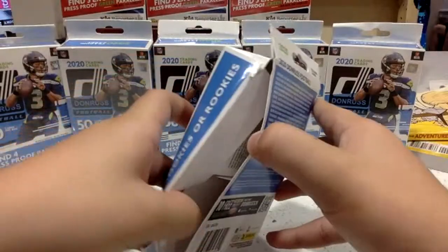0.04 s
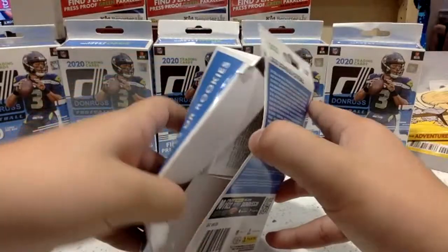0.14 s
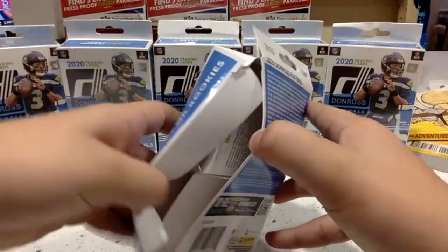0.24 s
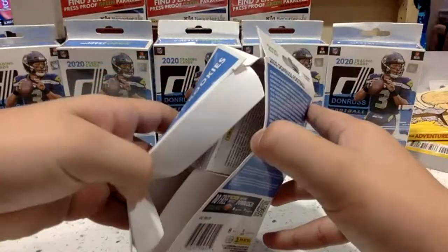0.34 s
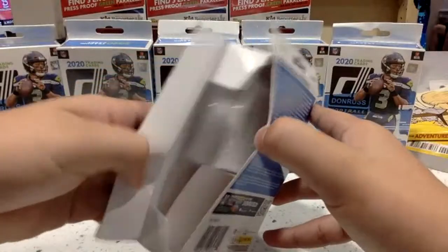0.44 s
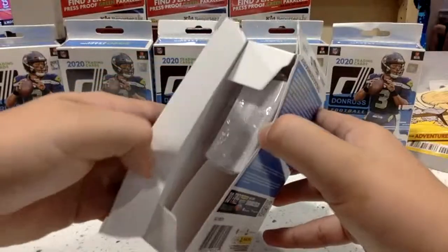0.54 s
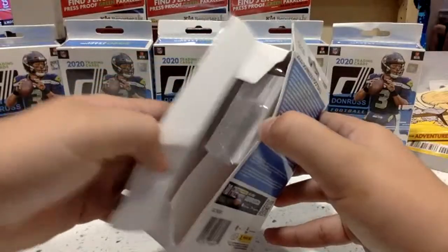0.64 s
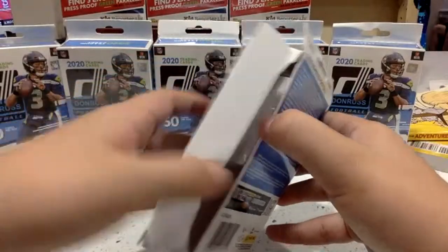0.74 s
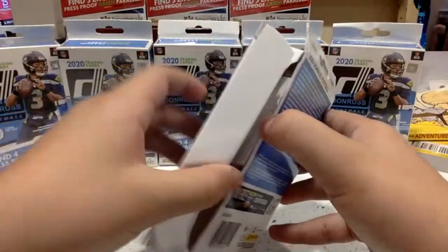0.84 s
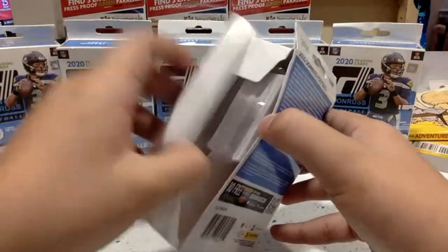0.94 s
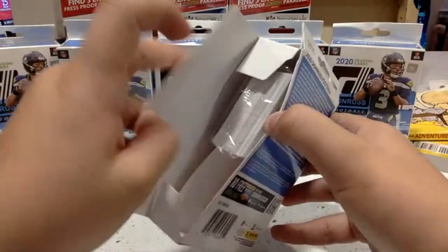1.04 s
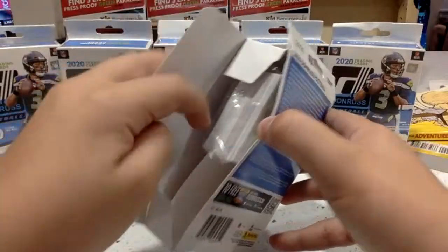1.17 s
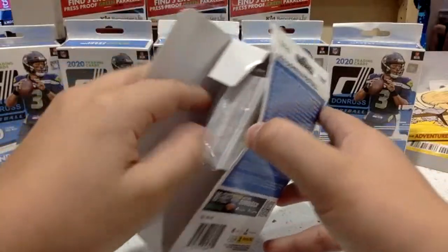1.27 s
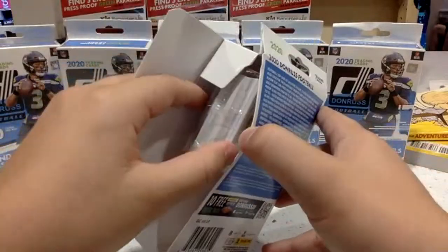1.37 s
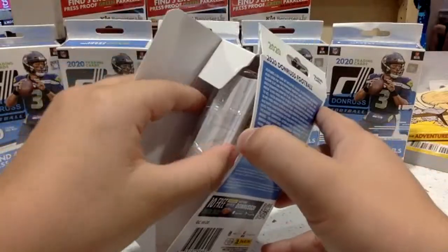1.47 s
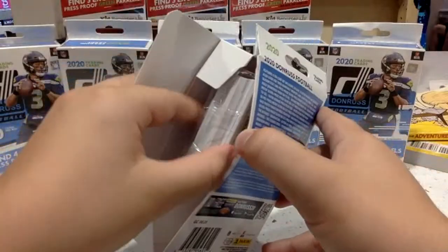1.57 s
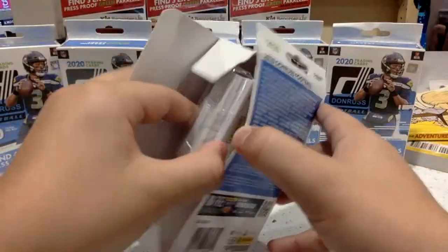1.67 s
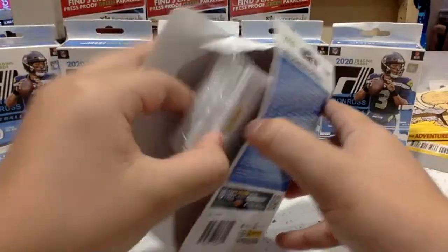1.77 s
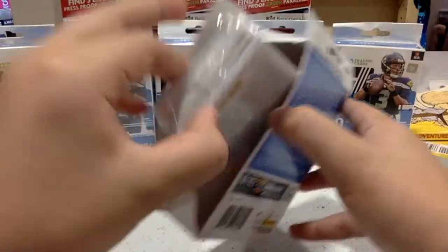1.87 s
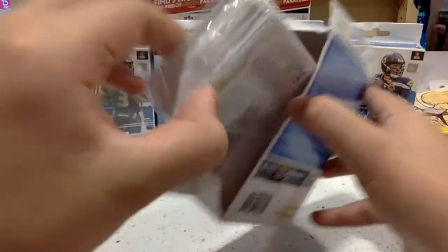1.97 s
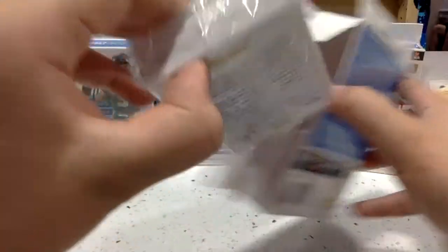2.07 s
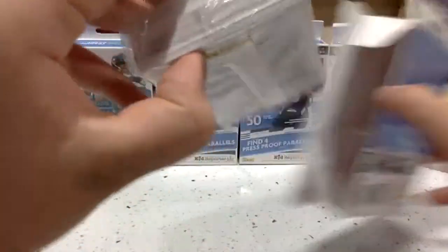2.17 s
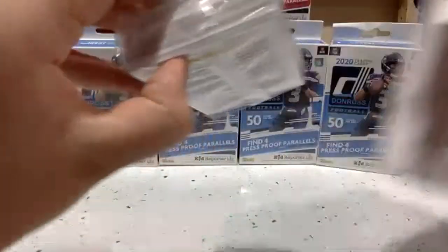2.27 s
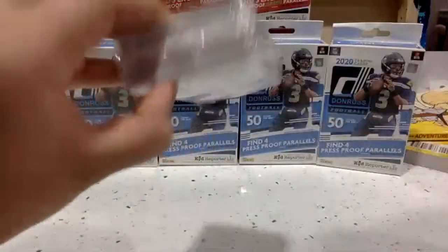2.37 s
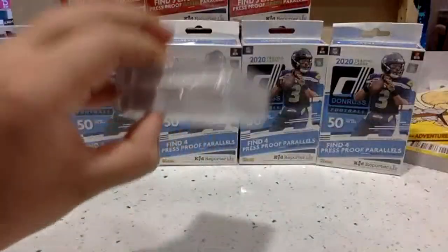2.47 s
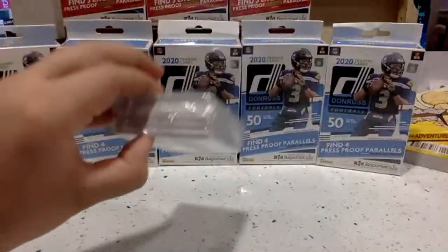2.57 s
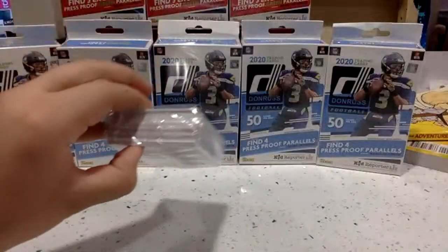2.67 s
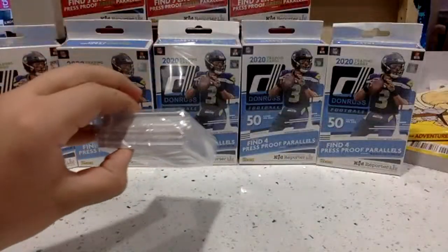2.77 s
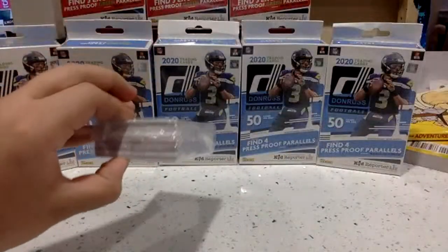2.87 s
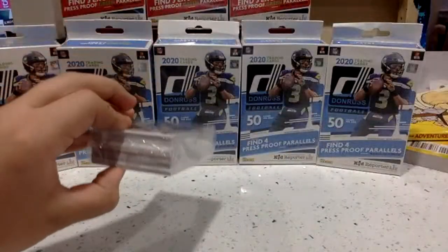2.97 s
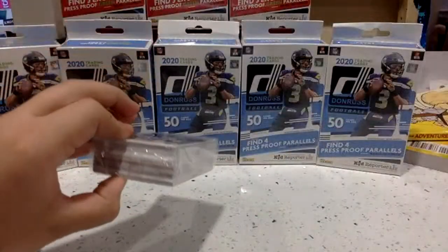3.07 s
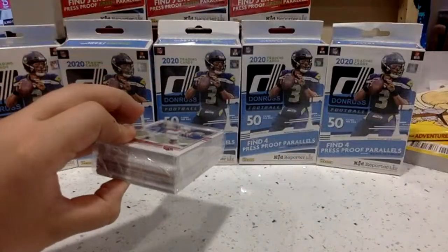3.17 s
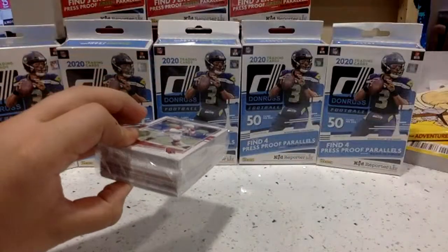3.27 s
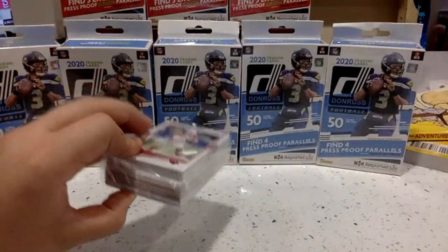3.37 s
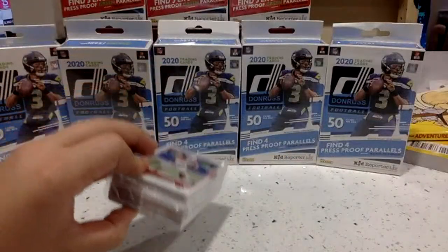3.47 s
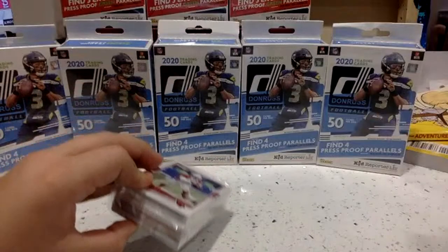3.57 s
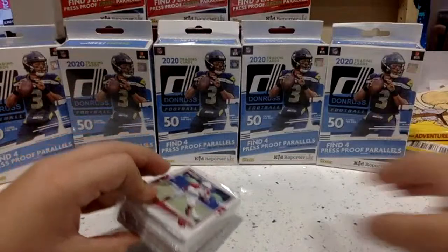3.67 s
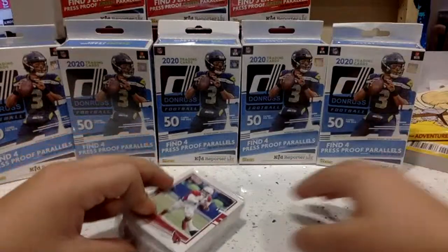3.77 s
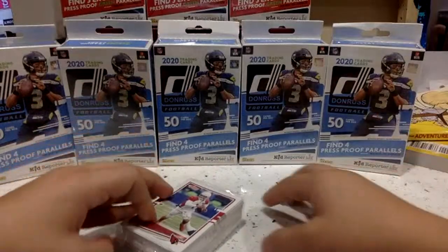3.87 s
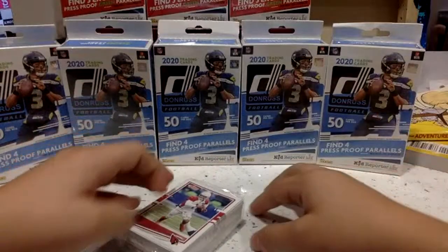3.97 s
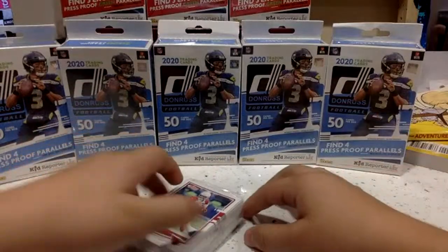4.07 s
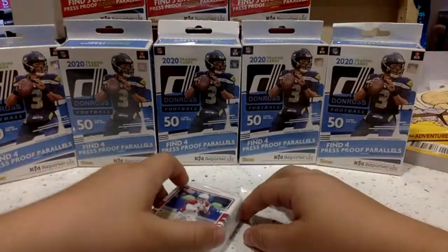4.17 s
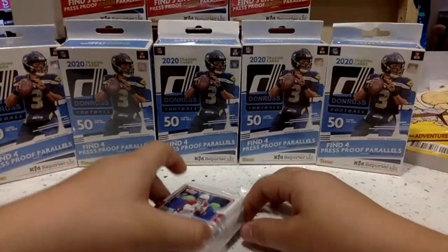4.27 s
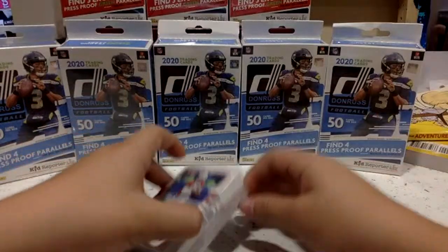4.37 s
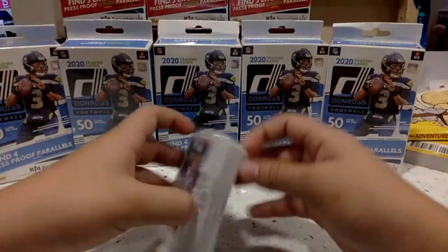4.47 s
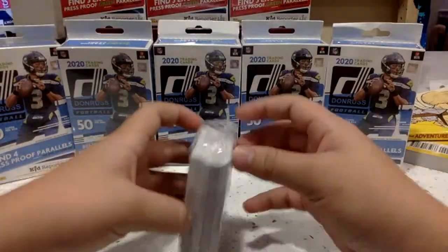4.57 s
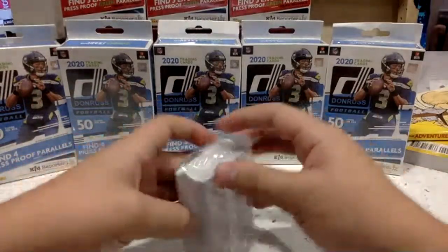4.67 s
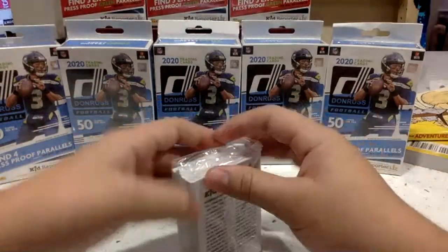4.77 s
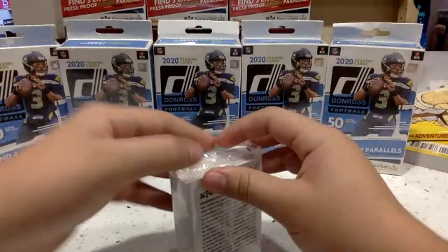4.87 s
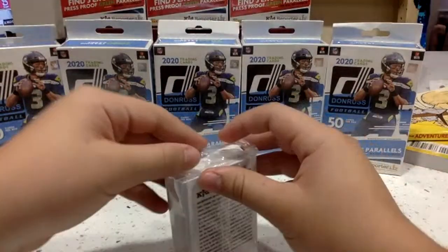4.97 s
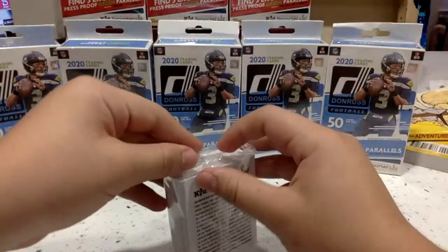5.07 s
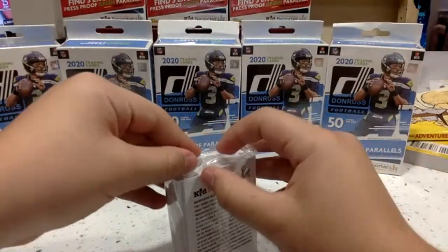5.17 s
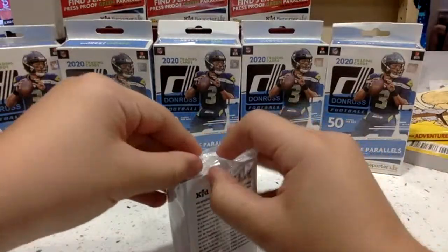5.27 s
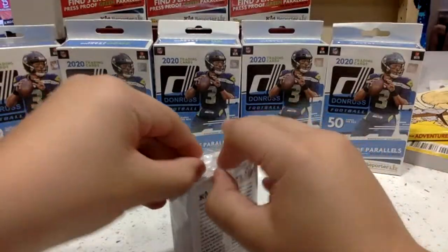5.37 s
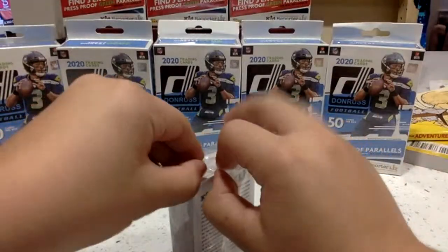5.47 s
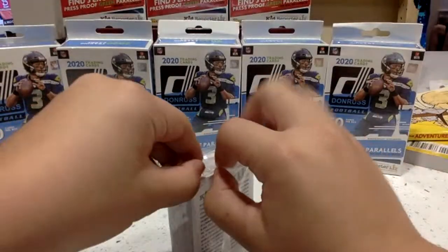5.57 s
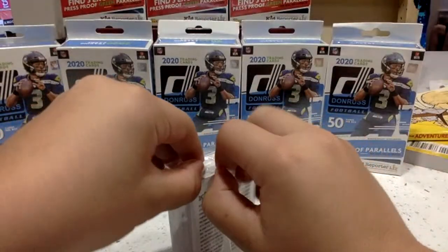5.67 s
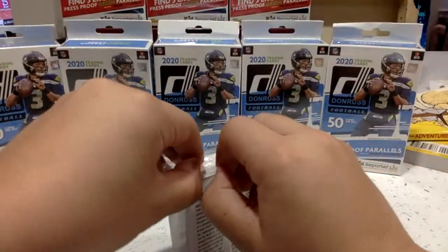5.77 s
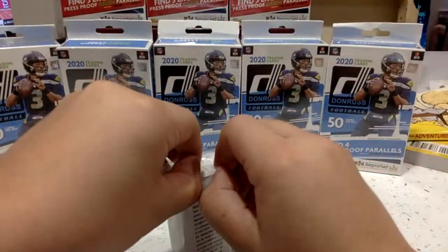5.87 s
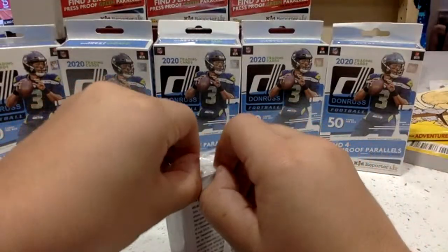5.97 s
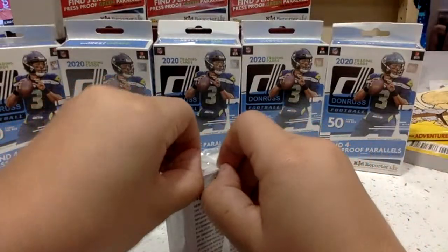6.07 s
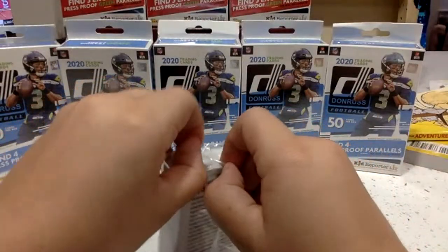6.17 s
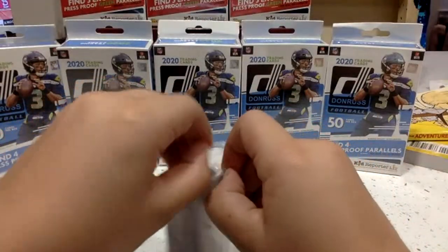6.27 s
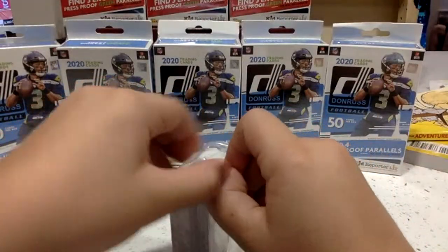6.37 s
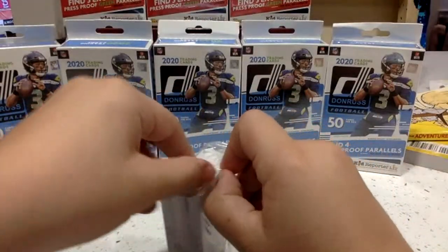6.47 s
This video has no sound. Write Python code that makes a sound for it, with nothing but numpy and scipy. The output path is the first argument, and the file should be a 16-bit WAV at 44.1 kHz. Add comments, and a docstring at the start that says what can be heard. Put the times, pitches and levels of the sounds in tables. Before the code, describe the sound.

Dry cardboard rubbing and boxy knocks come first, uneven and close. A hissy rustle and harder clack mark a wrapped pack being pulled free, then things nearly go quiet. After a light clatter, crisp film starts popping in clusters, growing into nearly continuous loud crackling with a few dull tocks from the cards. Short indoor reverberation, faint room air.

```python
"""Cellophane round a stack of cards buckles in sharp snaps over a fine crackle: noise spikes ring each fold.
Hands open a cardboard box, slide the stack out, set it on a counter and pick at the wrapper.
Stick-slip noise makes the scrapes, rubs and rustles, struck panel modes the knocks; short dry low pulses
are added, some with the loudest snaps. A small room answers with decaying noise, and the close microphone
overloads on the sharpest snaps."""
import sys
import numpy as np
from scipy import signal
from scipy.fft import rfft, irfft
from scipy.io import wavfile
from scipy.ndimage import uniform_filter1d, minimum_filter1d, map_coordinates

SR = 44100
rng = np.random.default_rng(int(sys.argv[2]) if len(sys.argv) > 2 else 0)


def unload_audio(sound):
    """Save the sound as a 16-bit wav file, at the path given as the first command line argument."""
    columns = np.transpose(np.atleast_2d(sound))
    # keep every value between -1 and 1, then stretch to whole-number steps
    steps = np.round(np.clip(columns, -1, 1) * 32767)
    wavfile.write(sys.argv[1], SR, steps.astype(np.int16))


N = 288414
TIME = np.arange(N) / SR


def amp(db):
    """Level: 20 dB is a factor of ten in amplitude."""
    return 10 ** (np.asarray(db) / 20)


def unit(x):
    """Normalisation: scales to an rms of one."""
    return x / np.sqrt(np.mean(x ** 2) + 1e-20)


def burst(x, seconds):
    """Energy normalisation: scales to the energy of a unit level held for that long."""
    return x / np.sqrt(np.sum(x ** 2) / (seconds * SR) + 1e-20)


def read(points, hz):
    """Interpolation: joins the points on a log-frequency axis."""
    f, value = np.transpose(points)
    return np.interp(np.log(hz + 1), np.log(f), value)


def add(mix, s, sound):
    """Superposition: mixes a sound in at time s."""
    part = mix[max(round(s * SR), 0):][:len(sound)]
    part += sound[:len(part)]


def impulse(points, size=1024):
    """Minimum phase: the causal impulse response of a colour, by the Hilbert transform of its log gain."""
    log_gain = np.log(amp(read(points, abs(np.fft.fftfreq(2 * size, 1 / SR)))))
    spectrum = np.exp(np.conj(signal.hilbert(log_gain)))
    return np.fft.ifft(spectrum).real[:size]


def through(x, response):
    """Convolution: passes a sound through a linear system."""
    return signal.fftconvolve(x, response)[:len(x)]


def band(x, low_hz, high_hz):
    """Band-pass filtering: keeps what lies between two frequencies."""
    return signal.sosfilt(signal.butter(2, [low_hz, high_hz], "band", fs=SR, output="sos"), x)


def above(x, hz, order):
    """High-pass filtering: keeps what lies above a frequency."""
    return signal.sosfilt(signal.butter(order, min(hz, .45 * SR), "high", fs=SR, output="sos"), x)


def ring(x, hz, width):
    """Resonance: a fixed mode with a gain of one at its centre."""
    return signal.lfilter(*signal.iirpeak(min(hz, .45 * SR), hz / width, SR), x)


def gliding_ring(x, hz, width):
    """Heterodyning: turns the curve hz down to zero, smooths there and turns back, a moving resonance."""
    turn = np.exp(2j * np.pi * np.cumsum(hz) / SR)
    r = np.exp(-np.pi * width / SR)
    smoothed = signal.lfilter([(1 - r) ** 2], [1, -2 * r, r * r], x / turn)
    return (turn * smoothed).real


def wander(per_s):
    """Slow random modulation: joins normal random knots, per_s of them each second."""
    knots = rng.standard_normal(2048)
    return np.interp(TIME * per_s, np.arange(len(knots)), knots)


def patchy(x, depth_db, spacing_hz):
    """Uneven radiation: each sound has its own hills and valleys across the spectrum."""
    hz = np.fft.rfftfreq(2 * len(x), 1 / SR)
    hills = np.clip(rng.standard_normal(128), -1.5, 1.5)
    colour = amp(depth_db * np.interp(hz / spacing_hz, np.arange(len(hills)), hills))
    return irfft(rfft(x, 2 * len(x)) * colour)[:len(x)]


def shifting(x, depth_db, spacing_hz, per_s):
    """Time-varying filtering: hills and valleys come and go across the spectrum."""
    hz, t, z = signal.stft(x, SR, nperseg=512)
    hills = np.clip(rng.standard_normal((256, 1024)), -2, 2)
    where = np.meshgrid(hz / spacing_hz, t * per_s, indexing="ij")
    colour_db = depth_db * map_coordinates(hills, where, order=1, mode="nearest")
    return signal.istft(z * amp(colour_db), SR, nperseg=512)[1][:N]


def gesture_db(age, length, attack_s, release_db_per_s):
    """Envelope: a hand movement takes hold quickly, lasts for its length and dies away."""
    attack_db = 20 * np.log10(np.clip(age / attack_s, 1e-9, 1))
    return attack_db - release_db_per_s * np.maximum(age - length, 0)


# spectrum of the room's air: (frequency [Hz], gain [dB])
AIR_COLOUR = [(30, -11), (450, -2.5), (1400, -13.5), (5000, -18), (16000, -27)]
# a faint tone in the room; centre frequency and middle level, about which it wanders
WHINE_HZ, WHINE_WIDTH_HZ, WHINE_DB = 1060, 25, -81


def ambience():
    """Filtered noise: the quiet air of the room, with a narrow-band whine that swells and fades."""
    air = amp(-75.0) * unit(through(rng.standard_normal(N), impulse(AIR_COLOUR)))
    whine_hz = WHINE_HZ * (1 + .02 * wander(0.79))
    whine = gliding_ring(rng.standard_normal(N), whine_hz, WHINE_WIDTH_HZ)
    swell_db = 4.1 * np.tanh(wander(4.1))
    return air + amp(WHINE_DB + swell_db) * unit(whine)


# modes of the box: (frequency [Hz], width [Hz], gain [dB])
BOX_MODES = [(316, 66, -3), (463, 17, -6.5), (585, 110, -1.5), (843, 120, 3.5), (1035, 130, -9),
             (1262, 23, -3.5)]


def panels(x):
    """Modal superposition: the box rings in all its modes."""
    return sum(amp(db) * ring(x, hz, width) for hz, width, db in BOX_MODES)


SLIP_S = 0.0025  # decay time of one slip


def slips(per_s, spread_db, smooth):
    """Stick-slip friction: brief ticks of grit, very uneven in size, over a smooth rub, steady in level."""
    size = amp(spread_db * np.minimum(rng.exponential(1, N), 4))
    starts = size * (rng.random(N) < per_s / SR)
    ticks = signal.lfilter([1], [1, -np.exp(-1 / (SLIP_S * SR))], starts)
    drive = (unit(ticks) + smooth) * rng.standard_normal(N)
    return drive / np.sqrt(abs(uniform_filter1d(drive ** 2, size=1300)) + 1e-9)


# strokes of rubbing, scraping and rustling: card edges, and fingers on film:
# (start [s], length [s], drone [dB], rasp [dB], hiss before its 3 dB cut [dB],
# swell over the stroke [dB], mean pitch of the song [Hz])
FRICTION_STROKES = [(0, 0.16, -28, -31, -38, 3.5, 986), (0.18, 0.13, -37, -34.5, -56, 4, 2168),
                    (0.354, 0.043, -32.5, -27.5, -56, 3, 2200), (0.429, 0.024, -42, -42, -67, -9, 2388),
                    (0.528, 0.15, -44, -36, -63, -9, 2028), (0.709, 0.084, -39, -40, -71, 9.5, 2457),
                    (1, 0.033, -71, -53, -76, 5, 2450), (1.048, 0.069, -63, -56.5, -72, 2.5, 3634),
                    (1.236, 0.07, -38, -33, -35.5, 6.5, 2595), (1.431, 0.043, -44.5, -43.5, -71, 0.5, 2420),
                    (1.533, 0.044, -50, -55, -82, 23, 2180), (1.6, 0.067, -40.5, -42, -68, -1.5, 2716),
                    (1.735, 0.12, -34.5, -26.5, -24, 9, 5210), (1.866, 0.0082, -39, -18.5, -44, -8, 1036),
                    (1.899, 0.16, -31, -31.5, -40.5, 5.5, 971), (2.09, 0.076, -36.5, -39, -38, 6, 1908),
                    (2.164, 0.016, -47, -16.5, -39, -12, 1841), (2.381, 0.1, -65.5, -63.5, -53.5, 16, 2210),
                    (3.112, 0.029, -39.5, -43, -62.5, 4.5, 2870),
                    (3.241, 0.088, -36, -38, -69, -20.5, 2400), (3.835, 0.098, -98, -44, -36, -2, 3380),
                    (4.17, 0.052, -41.5, -28.5, -43, -3.5, 2276), (4.884, 0.036, -84, -37.5, -73, 4, 2183),
                    (5.343, 0.024, -73, -35, -33, 0, 3310), (5.71, 0.04, -84, -28.5, -48, -10, 2920),
                    (6.45, 0.049, -51, -31, -44, 2, 2300)]
STROKE_ATTACK_S, STROKE_RELEASE_DB_PER_S = 0.0039, 414


def stroke_gains():
    """Amplitude modulation: drone, rasp and hiss follow the same envelope within each stroke."""
    gains, age = np.zeros((3, N)), np.arange(SR // 2) / SR
    for start, length, *levels, swell_db, _ in FRICTION_STROKES:
        shape_db = gesture_db(age, length, STROKE_ATTACK_S, STROKE_RELEASE_DB_PER_S)
        shape_db += swell_db * (np.minimum(age / length, 1) - .5)
        for gain, db in zip(gains, levels):
            add(gain, start, amp(db + shape_db))
    return gains


# colour of the rasp, heard in the knocks too: (frequency [Hz], gain [dB])
RASP_COLOUR = [(300, -40), (900, -25), (1400, -7), (1900, 2.5), (2400, -2), (3300, -0.5), (5300, -10.5),
               (7500, -32), (12000, -17.5), (16000, -25.5)]
# colour of the sizzle, heard in the snaps too: (frequency [Hz], gain [dB])
SIZZLE_COLOUR = [(2000, -77.5), (6500, -10), (8000, -10.5), (9800, -2), (12800, -4), (15300, -1.5),
                 (16500, -5)]
SONG_WIDTH_HZ, SONG_DB = 460, -3.5  # a singing resonance; level against the rasp
SQUEAK_HZ, SQUEAK_WIDTH_HZ, SQUEAK_DB = 5300, 710, -6.5  # level against the hiss
PITCH_DRIFT = 0.07  # share by which song and squeak wander


def friction():
    """Friction excitation: rubs, scrapes and rustles drone through the box modes, rasp, sing, hiss and squeak."""
    drone, rasp, hiss = stroke_gains()
    catches = slips(per_s=170, spread_db=3.0, smooth=0.83)
    resonant = band(panels(catches), 410, 1300)
    body = drone * unit(shifting(resonant, depth_db=5.0, spacing_hz=168.6, per_s=30))

    starts, *_, pitches = np.transpose(FRICTION_STROKES)
    latest = np.maximum(np.searchsorted(starts, TIME) - 1, 0)  # each pitch holds until the next stroke
    song_hz = pitches[latest] * (1 + PITCH_DRIFT * wander(28))
    song = gliding_ring(catches, song_hz, SONG_WIDTH_HZ)
    scrape = unit(through(catches, impulse(RASP_COLOUR))) + amp(SONG_DB) * unit(song)
    raspy = rasp * unit(shifting(scrape, depth_db=3.5, spacing_hz=404, per_s=49))

    fizz = catches + 2.0 * slips(per_s=5900, spread_db=8.5, smooth=0.97)
    squeak_hz = SQUEAK_HZ * (1 + PITCH_DRIFT * wander(26))
    squeak = gliding_ring(fizz, squeak_hz, SQUEAK_WIDTH_HZ)
    rub = unit(through(fizz, impulse(SIZZLE_COLOUR))) + amp(SQUEAK_DB) * unit(squeak)
    hissing = hiss * unit(shifting(rub, depth_db=6.0, spacing_hz=604, per_s=130))
    return body + raspy + amp(-3.0) * hissing


# colour of the hollow of the box: (frequency [Hz], gain [dB])
HOLLOW_COLOUR = [(25, -30.5), (60, -15), (125, -4), (240, 2), (340, -0.5), (600, -39.5), (2000, -69)]
# blows on the box and the stack: (time [s], level [dB], main ring [Hz], crack against the ring [dB],
# thump against the ring [dB])
BLOWS = [(0.097, -34.5, 980, 15, -8.5), (0.224, -28, 600, 8, -29), (0.4977, -28.5, 1150, 12.5, -33),
         (0.503, -19, 542, 10.5, -12), (0.73, -28.5, 940, 7, -16), (0.795, -34, 1240, 15, -32.5),
         (1.108, -53.5, 280, -14, -15.5), (1.322, -40.5, 264, 3, -3.5), (1.412, -31.5, 833, 3, -22),
         (1.587, -33, 920, 3, -22), (1.876, -15.5, 836, 2, -54), (1.881, -15.5, 870, -18, -36),
         (1.989, -22.5, 540, 6, -13), (2.045, -24.5, 935, 7.5, -15), (2.159, -26.5, 860, 13.5, -16),
         (2.17, -19.5, 902, 4, -15), (2.276, -30, 937, 6.5, -15.5), (2.465, -43.5, 456, 1, -27),
         (2.727, -56.5, 360, -10, 1), (3.121, -40.5, 321.5, 7, -4.5), (3.212, -31.5, 1120, 11, -11.5),
         (3.224, -28, 741, 8.5, -12.5), (4.222, -41, 1180, 21, -8), (4.736, -39.5, 960, 24, -8),
         (6.46, -38.5, 1194, 0, -33)]


def knocks():
    """Impact excitation: a flap or the stack strikes, chatters and rings the box; the hollow answers late."""
    out, t = np.zeros(N), np.arange(6000) / SR
    rasp, thump = impulse(RASP_COLOUR), impulse(HOLLOW_COLOUR, size=2048)
    for s, db, hz, crack_db, thump_db in BLOWS:
        grit = rng.standard_normal(len(t))
        blow = grit * np.exp(-t / 0.0061) * (1 - np.exp(-t / 0.018))
        push = np.exp(-t / 0.00028)  # the first clean contact, before the chatter
        contact = burst(blow, 0.028) + 0.47 * burst(push, 0.0079)
        body = 0.99 * burst(ring(contact, hz, 97), 0.011) + 0.53 * burst(panels(contact), 0.022)
        chatter = grit * abs(grit) * np.exp(-t / 0.0067) * (1 - np.exp(-t / 0.00029))
        crack = patchy(through(chatter, rasp), depth_db=12.0, spacing_hz=336.6)
        sound = burst(band(body, 270, 1000), 0.033) + amp(crack_db) * burst(crack, 0.0064)
        hollow = through(contact * (1 - np.exp(-t / 0.016)), thump)
        sound += amp(thump_db) * burst(hollow + 0.62 * band(hollow, 80, 160), 0.045)
        add(out, s - .001, amp(db) * sound)
    return out


CUT_BASE_HZ, CUT_SHARE = 897, 0.27  # cutoff: this base plus a share of the ring


def radiated(x, hz):
    """Radiation cutoff: a small patch of film radiates waves longer than itself only feebly."""
    return above(x, CUT_BASE_HZ + CUT_SHARE * hz, order=8)


# colour of a fold of film: (frequency [Hz], gain [dB])
FOLD_COLOUR = [(100, -32.5), (500, -1), (900, -7), (1400, -1.5), (2100, 3), (3000, -3.5), (4200, -0.5),
               (5600, -3), (7600, -26.5), (11000, -21), (16000, -22)]


def buckle(rows, patchy_db, patch_hz):
    """Snap-through buckling: a short swell of noise, a spike, a flutter, a second spike springing back."""
    out, t = np.zeros(N), np.arange(1024) / SR
    fold, sizzle = impulse(FOLD_COLOUR), impulse(SIZZLE_COLOUR)
    lead = .003  # length of the swell before the spike, s
    for s, db, hz, sizzle_db in rows:
        grit = rng.standard_normal(len(t))
        softness, gap, spring, tint = rng.random(4)
        age = np.maximum(t - lead, 0)
        spike = np.exp(-age / (0.00043 + 0.0011 * softness)) + 0.3 * np.exp(-age / 0.0039)
        drive = grit * np.where(t < lead, 0.25 * (t / lead) ** 2, spike)
        delay = int(SR * (0.00083 + 0.002 * gap))
        bounce = np.roll(spike * (t >= lead), delay) * rng.standard_normal(len(t))
        drive = patchy(drive + 0.82 * spring * bounce, depth_db=patchy_db, spacing_hz=patch_hz)
        sheet, top = radiated(through(drive, fold), hz), through(drive, sizzle)
        low = unit(ring(sheet, hz, 0.12 * hz)) + 0.99 * unit(sheet)
        high = unit(ring(top, 12200 + 1400 * tint, 420)) + 2.3 * unit(top)
        sound = burst(low, 0.0052) + amp(sizzle_db) * burst(high, 0.006)
        add(out, s - lead, amp(db) * sound)
    return out


# sharp snaps and clicks, mostly folds of film, a few the bright edge of a knock; they drive the stack too:
# (time [s], level [dB], ring [Hz], sizzle against the ring [dB])
SHARP_SNAPS = [(0.101, -22.5, 5160, 3), (0.2, -38, 3560, 18), (0.285, -30.5, 2100, 1.5),
               (0.371, -31, 1880, -28), (0.3852, -35, 2000, -7), (0.418, -30, 2000, -22),
               (0.44, -47, 3570, -9), (0.508, -14, 2700, -1.5), (0.5706, -29.5, 2320, 2.5),
               (0.749, -29.5, 2700, -17), (0.7984, -24.5, 2500, -7), (1.0053, -41.5, 3600, -31),
               (1.391, -31, 2270, 13), (1.4094, -24.5, 2310, -1), (1.5864, -11.5, 2720, -23),
               (1.671, -30, 2540, -10), (1.685, -34.5, 6240, 6.5), (1.714, -35, 4000, -12),
               (1.8413, -14.5, 2240, -7), (1.9895, -15, 1930, -35), (2.024, -29.5, 3940, 8),
               (2.047, -17, 3900, 0), (2.073, -28, 2570, 8.5), (2.096, -26, 3800, 1),
               (2.147, -22.5, 3550, -5), (2.5591, -32.5, 6620, 10), (2.6165, -36, 5800, 2),
               (2.9435, -29, 5220, 13.5), (3.1182, -34.5, 2600, -25), (3.177, -35, 3000, -24),
               (3.199, -31, 2500, -26), (3.2112, -19.5, 2700, -2), (3.223, -21, 3730, -12),
               (3.245, -23.5, 3670, -11), (3.256, -29, 3600, -12), (3.409, -29, 6000, 2),
               (3.55, -30.5, 6530, 9), (3.592, -52, 6000, 19.5), (3.661, -20.5, 3780, 8),
               (3.6747, -26, 4330, -4), (3.7589, -32, 5500, 14.5), (3.7842, -24, 4100, 9.5),
               (3.7938, -30, 4330, -9), (3.8154, -16, 5600, 2.5), (3.823, -16.5, 3400, 8.5),
               (3.8302, -15, 5800, 6.5), (3.9228, -18, 3200, -4), (3.935, -14, 3440, 2.5),
               (4.1592, -28.5, 2600, -20), (4.2094, -23.5, 2560, 0), (4.222, -17.5, 1700, 10.5),
               (4.2794, -24, 2920, 4), (4.289, -26.5, 2480, 9.5), (4.303, -17.5, 2050, 1),
               (4.31, -17, 1830, 1), (4.3207, -13.5, 2720, -12), (4.3363, -24.5, 6860, 10),
               (4.3442, -20, 2800, 1), (4.362, -20, 5900, 6), (4.385, -22, 1520, -13),
               (4.409, -15.5, 3380, 6), (4.418, -18, 1570, 7.5), (4.4394, -24, 1770, 4.5),
               (4.505, -42, 6800, 24), (4.51, -37.5, 4354, 21), (4.5466, -26, 2858, 4),
               (4.559, -25.5, 2210, 7), (4.5787, -12, 4140, 4), (4.594, -16.5, 3900, 2),
               (4.623, -27.5, 4170, 4), (4.678, -19.5, 3900, -5), (4.7139, -24, 1700, 0),
               (4.725, -13, 2620, 3), (4.739, -22, 5180, 14), (4.804, -27, 2780, -3),
               (4.8255, -29.5, 2280, 6.5), (4.839, -29.5, 4000, 6.5), (4.86, -25.5, 3720, -1),
               (4.9311, -25, 2330, 5), (4.9712, -13, 2030, -9), (4.997, -13, 5100, 4),
               (5.1246, -28.5, 3340, -10), (5.1425, -20, 4360, 2), (5.197, -25, 5370, 7.5),
               (5.211, -27, 2030, 6), (5.221, -25, 2500, 2), (5.228, -19, 2350, -23),
               (5.2348, -16, 5440, -0.5), (5.3025, -18, 3700, 2), (5.3237, -23, 2530, 0),
               (5.3792, -17.5, 3170, -9), (5.3905, -15, 2120, 3.5), (5.3946, -16.5, 2580, 4),
               (5.4197, -11.5, 5260, -7), (5.4278, -14, 2210, 1), (5.454, -16, 3500, -1.5),
               (5.463, -12.5, 3640, -8), (5.497, -22, 3960, 2), (5.528, -17, 5130, 3),
               (5.565, -30.5, 2520, 12.5), (5.5717, -31.5, 2270, 2), (5.619, -18, 2460, 3),
               (5.637, -23, 5300, -31), (5.6733, -14.5, 5120, 1), (5.685, -32, 2820, 2),
               (5.7003, -12.5, 3630, 7), (5.783, -18, 3480, -0.5), (5.7918, -10, 4530, 4),
               (5.8297, -28, 4090, 10), (5.8501, -20, 4300, 4.5), (5.8768, -16, 4060, -5.5),
               (5.894, -26, 6914, 14), (5.915, -16.5, 3860, 0.5), (5.9289, -14.5, 5076, 7.5),
               (5.947, -20, 3650, -9), (5.9585, -17.5, 3670, -5), (5.9936, -26.5, 2144, 2),
               (6.0488, -18.5, 6586, 9.5), (6.055, -20, 6300, 12), (6.065, -23, 6160, 9),
               (6.097, -18.5, 4200, -3), (6.1027, -13.5, 2460, 2), (6.1253, -16, 2455, -4),
               (6.1348, -17.5, 2930, -3), (6.145, -12, 4220, -2), (6.178, -22.5, 2300, -1.5),
               (6.1885, -16.5, 2205, -2), (6.1973, -16.5, 2370, 1.5), (6.2186, -15.5, 2730, -11),
               (6.2315, -18, 2660, 1.5), (6.2356, -11.5, 2910, -13), (6.2797, -25, 4410, -8),
               (6.301, -16.5, 4500, 8), (6.3228, -28, 3795, -2), (6.3735, -19.5, 3880, -1),
               (6.38, -19.5, 2040, 5), (6.3895, -18.5, 2290, 0), (6.4033, -21.5, 2540, 3),
               (6.4364, -33, 3496, -23.5), (6.4596, -13.5, 2390, -9), (6.501, -9, 3147, 2.5),
               (6.5192, -18.5, 2506, 1)]


def snaps():
    """Impulsive radiation: sharp snaps and clicks, mostly folds of film, a few the bright edge of a knock."""
    return buckle(SHARP_SNAPS, patchy_db=3.5, patch_hz=659)


# how firmly the film is pulled against the cards: (time [s], tug against the snap [dB])
FILM_GRIP = [(3.66, -40), (3.78, -19), (3.82, 2.5), (4.58, -2.5), (5.2, -1), (5.3, -32), (5.39, 1.5),
             (5.48, -13), (6.12, -14), (6.3, 2.5)]
STACK_HZ, STACK_WIDTH_HZ, STACK_DECAY_S = 933, 220, 0.007


def stack():
    """Coupled resonance: each snap tugs at the cards, which answer with a dull tock where the film is taut."""
    tugs, t = np.zeros(N), np.arange(2048) / SR
    for s, db, _, _ in SHARP_SNAPS:
        tug = burst(rng.standard_normal(len(t)) * np.exp(-t / STACK_DECAY_S), 0.007)
        grip_db = np.interp(s, *np.transpose(FILM_GRIP))
        add(tugs, s, amp(db + grip_db) * tug)
    tock = ring(tugs, STACK_HZ, STACK_WIDTH_HZ)
    return above(band(tock, 340, 2200), 330, order=3)


# short dry low pulses, some with the loudest snaps: (time [s], peak before the high-pass [dB])
LOW_PULSES = [(3.7627, -10.5), (3.7841, -21), (3.8156, -19.5), (5.7925, -19), (5.9295, -18.5),
              (6.5032, -17.5)]
PULSE_RISE_S, PULSE_LOW_HZ = 0.000092, 140


def low_pulses():
    """Pulse radiation: each is one short, dry push of air that does not ring."""
    out, u = np.zeros(N), np.arange(1024) / SR / PULSE_RISE_S
    for s, db in LOW_PULSES:
        add(out, s, amp(db) * above(u * np.exp(1 - u), PULSE_LOW_HZ, order=2))
    return out


# squeezes of the wrapper: (start [s], length [s], level of the creases before spread and 1.5 dB lift [dB],
# mean sizzle against their ring [dB])
WRAPPER_SQUEEZES = [(3.811, 0.0062, -21.5, 1.5), (3.898, 0.039, -24.5, 3.5), (4.276, 0.26, -52, 10),
                    (4.49, 0.083, -35.5, 7.5), (4.722, 0.052, -31, 0), (4.92, 0.11, -39, -1.5),
                    (5.554, 0.019, -48, 10), (5.735, 0.02, -31.5, -2), (5.809, 0.148, -35.5, 6.5),
                    (6.045, 0.016, -31, 2), (6.214, 0.2, -36, -1), (6.369, 0.17, -33.5, -9)]
SQUEEZE_ATTACK_S, SQUEEZE_RELEASE_DB_PER_S = 0.012, 440
CREASES_PER_S, CREASE_SPREAD_DB, SIZZLE_SPREAD_DB = 130, 14, 9.5
CREASE_LOW_HZ, CREASE_SPAN_HZ = 2230, 2780
FAINTEST_DB = -70  # weaker creases are left out


def crackle(count=400):
    """Crackling noise: small creases pop one after another in each squeeze and fade as the film relaxes."""
    when, size, pitch, shine = rng.random((count, 4)).T
    times = WRAPPER_SQUEEZES[0][0] + (np.arange(count) + when) / CREASES_PER_S
    effort_db = np.array([db + gesture_db(times - start, length, SQUEEZE_ATTACK_S, SQUEEZE_RELEASE_DB_PER_S)
                          for start, length, db, _ in WRAPPER_SQUEEZES])
    level_db = effort_db.max(axis=0) + CREASE_SPREAD_DB * (size - .5) + 1.5
    strongest = effort_db.argmax(axis=0)
    sizzle_db = np.array(WRAPPER_SQUEEZES)[strongest, -1] + SIZZLE_SPREAD_DB * (shine - .5)
    ring_hz = CREASE_LOW_HZ + CREASE_SPAN_HZ * pitch ** 2
    creases = np.transpose([times, level_db, ring_hz, sizzle_db])
    heard = (times < N / SR) & (level_db > FAINTEST_DB)
    return buckle(creases[heard], patchy_db=15.0, patch_hz=553)


# reverberation of the room: (frequency [Hz], time to decay by 60 dB [s])
ROOM_DECAY = [(150, 0.5), (800, 0.3), (2500, 0.35), (5000, 0.24), (9000, 0.09), (15000, 0.22)]


def room(x):
    """Diffuse reverberation: dense reflections that build up over a few ms and die band by band."""
    noise = rng.standard_normal(SR // 2)
    hz, t, z = signal.stft(noise, SR, nperseg=256)
    decay = amp(-60 * t / read(ROOM_DECAY, hz)[:, None])
    tail = signal.istft(z * decay, SR, nperseg=256)[1]
    tail = tail * np.clip((np.arange(len(tail)) / SR - .015) / 0.009, 0, 1)  # silent for the first 15 ms
    return through(x, tail / np.linalg.norm(tail))  # the tail carries an energy of one


# how much the surroundings throw back: (frequency [Hz], gain [dB])
REFLECTION_COLOUR = [(600, -1), (1300, 1.5), (2500, -4.5), (5500, -4.5), (8000, 5), (14000, -0.5)]


def scene():
    """Direct and reverberant sound: wrapper and box close to the microphone, in a small quiet room."""
    snapping = snaps() + crackle() + stack()
    handling = knocks() + friction()
    sent = amp(-17.5) * snapping + amp(-19) * handling
    echo = room(through(sent, impulse(REFLECTION_COLOUR)))
    echo = shifting(echo, depth_db=4.0, spacing_hz=458.4, per_s=60)  # the tails flicker in colour
    return (snapping + handling + low_pulses() + echo + ambience())[None]


EDGE_HZ = 16050  # upper band limit


def record(dry):
    """Nonlinear transduction: suppressed faint tails, fast limiting, uneven saturation, then a band limit."""
    level_db = 10 * np.log10(abs(uniform_filter1d(dry[0] ** 2, size=600)) + 1e-12)
    gated = dry[0] * amp(np.clip(0.55 * (level_db + 45), -7, 0))  # at most 7 dB down, below -45 dB
    headroom = 1.4 / np.maximum(abs(gated), 1.4)
    limited = gated * uniform_filter1d(minimum_filter1d(headroom, size=45), size=45)
    clipped = limited / (1 + limited ** 8) ** (1 / 8)
    lopsided = above(clipped + 0.013 * clipped ** 2, 55, order=2)  # the square makes the halves unequal
    low_pass = signal.firwin(255, EDGE_HZ, window=("kaiser", 8), fs=SR)
    return signal.oaconvolve(lopsided, low_pass, "same")[None]


dry = scene()
out = record(dry)
unload_audio(out)
```